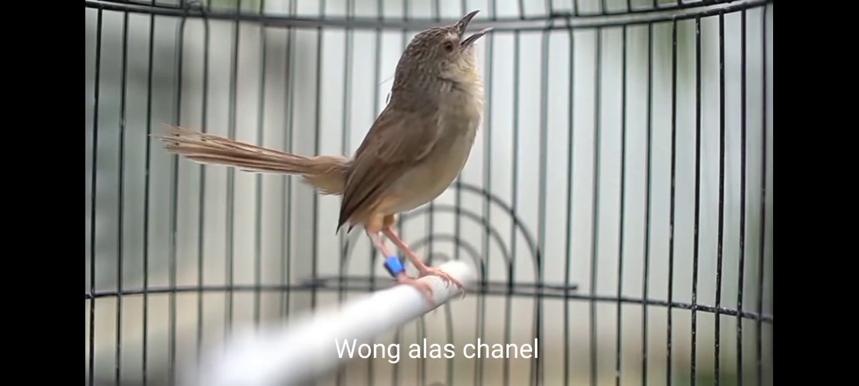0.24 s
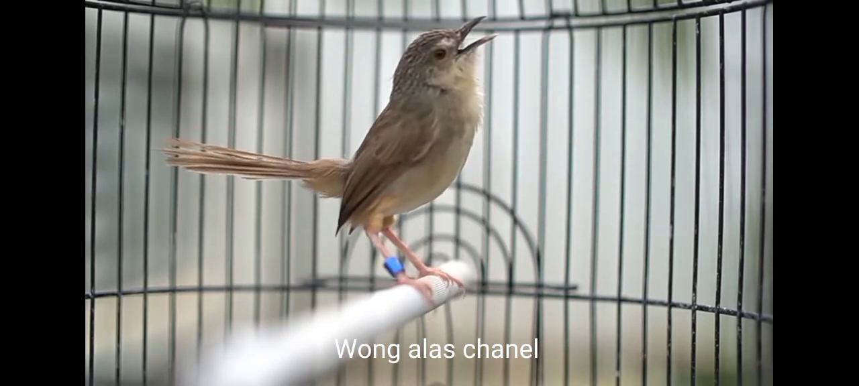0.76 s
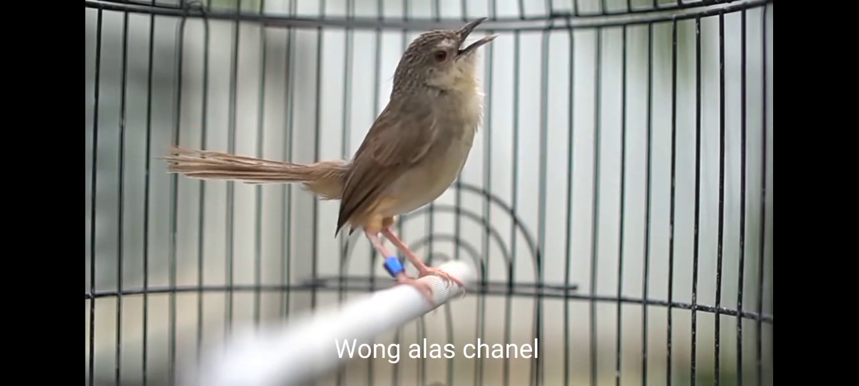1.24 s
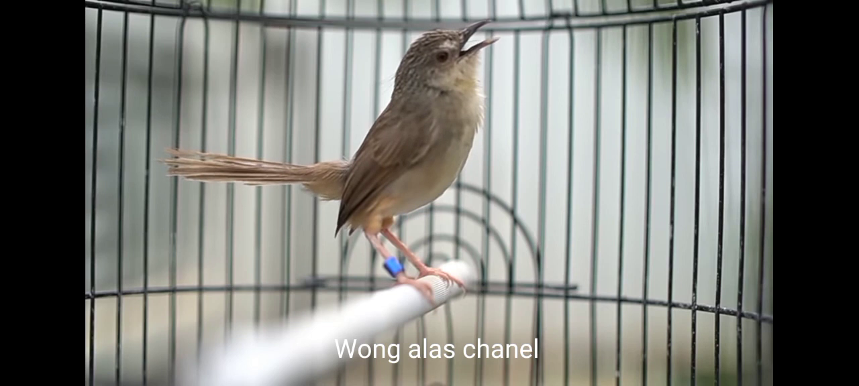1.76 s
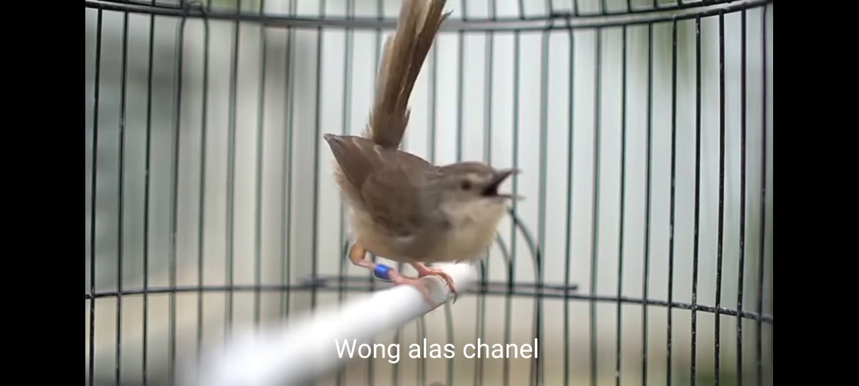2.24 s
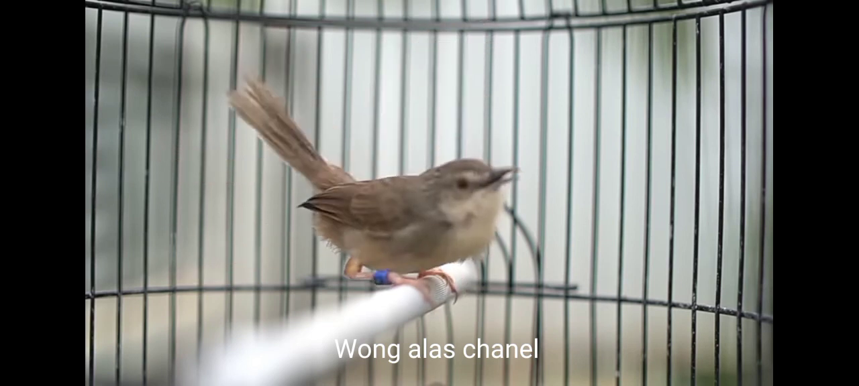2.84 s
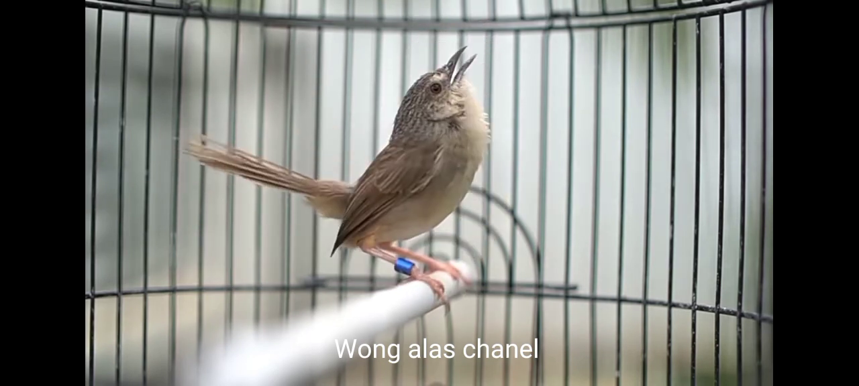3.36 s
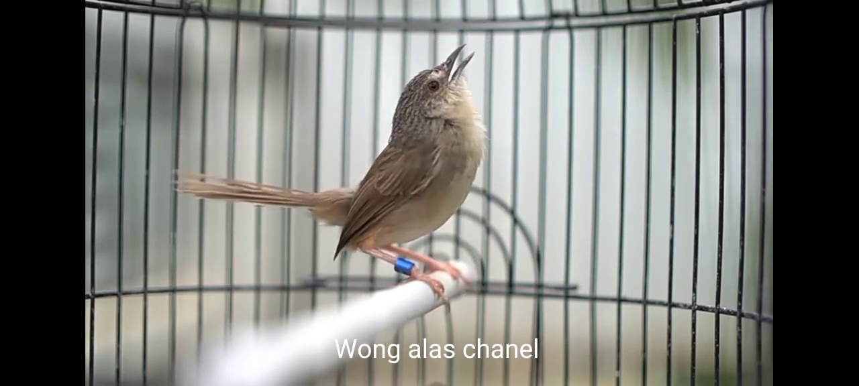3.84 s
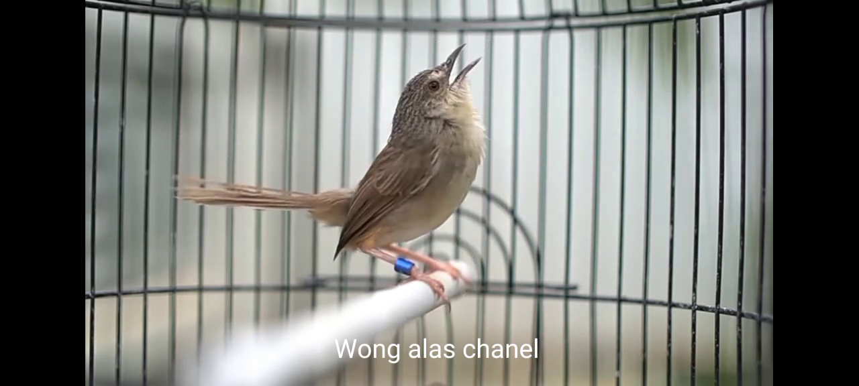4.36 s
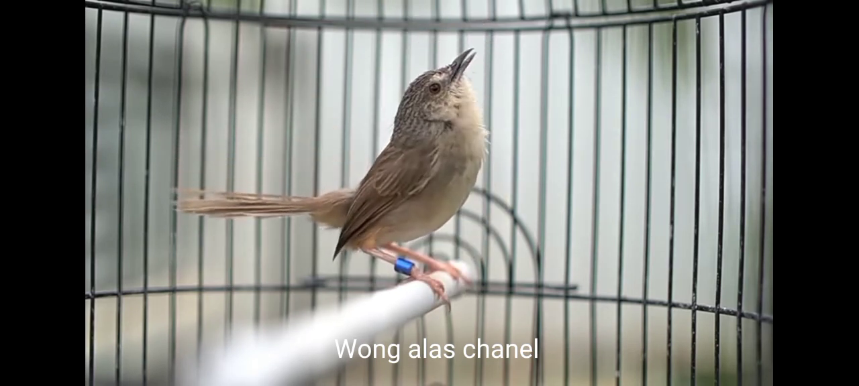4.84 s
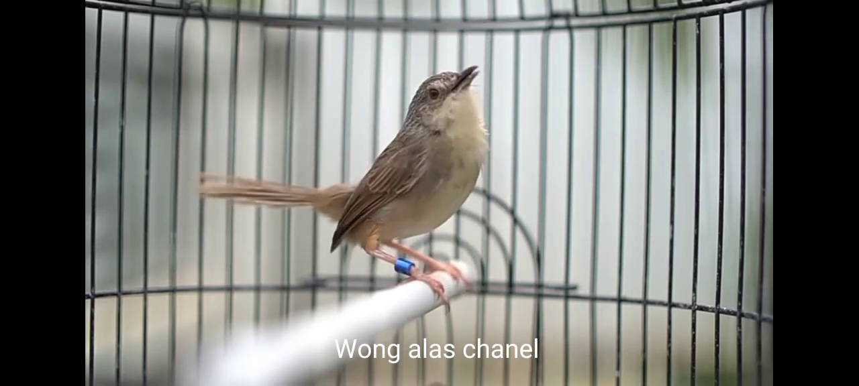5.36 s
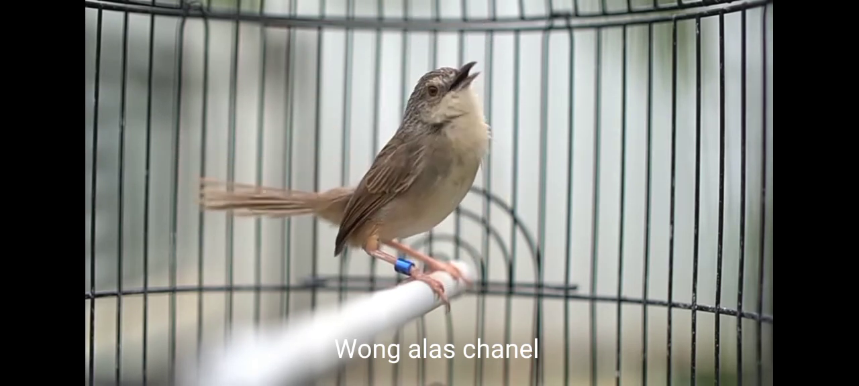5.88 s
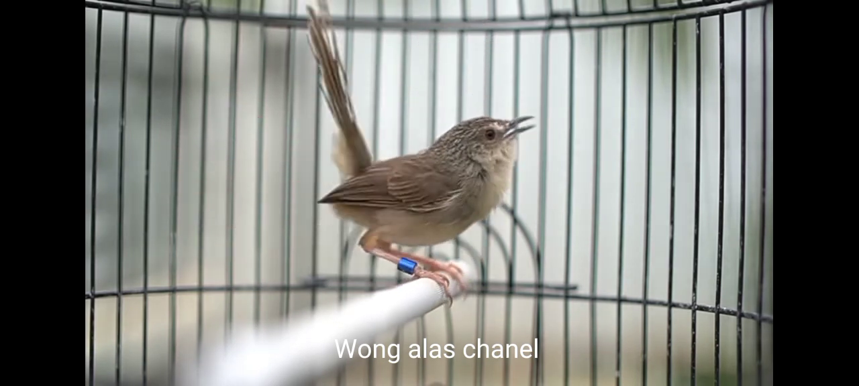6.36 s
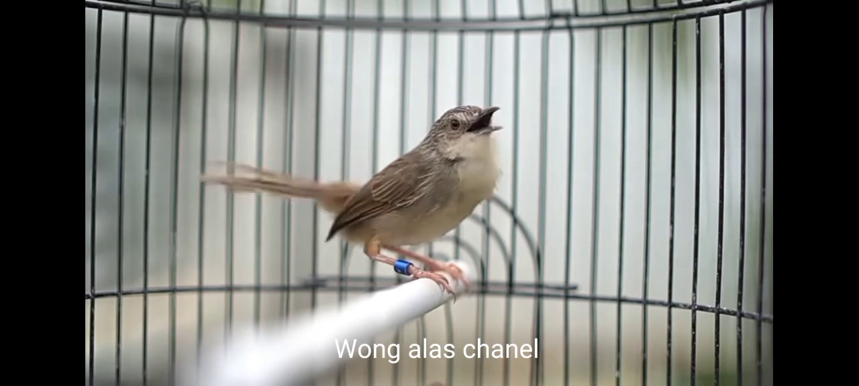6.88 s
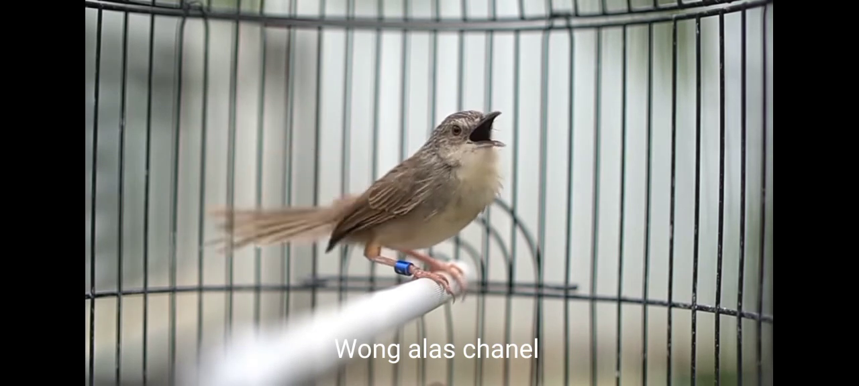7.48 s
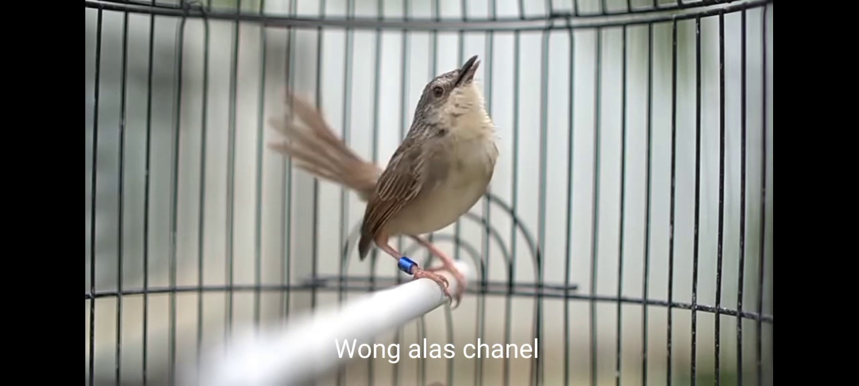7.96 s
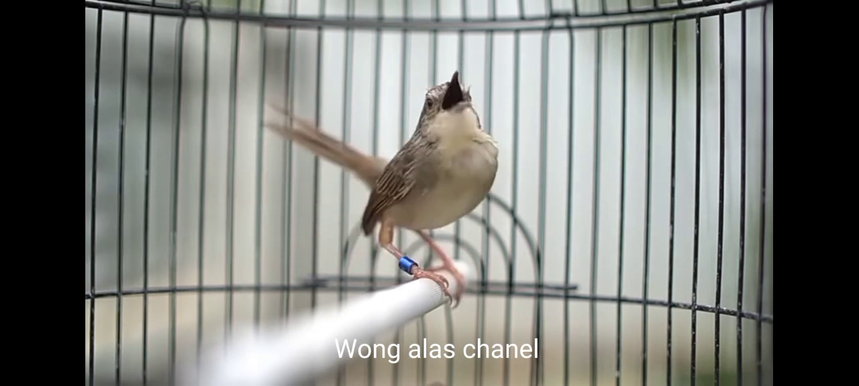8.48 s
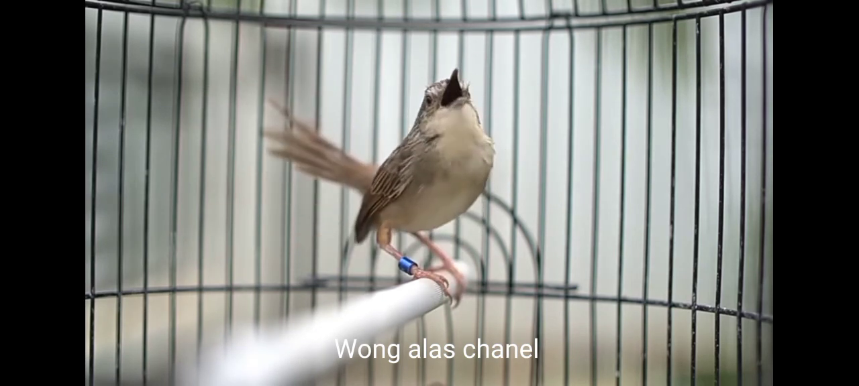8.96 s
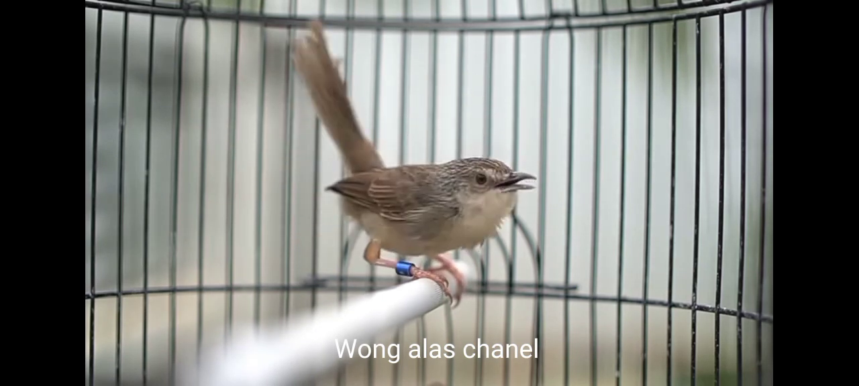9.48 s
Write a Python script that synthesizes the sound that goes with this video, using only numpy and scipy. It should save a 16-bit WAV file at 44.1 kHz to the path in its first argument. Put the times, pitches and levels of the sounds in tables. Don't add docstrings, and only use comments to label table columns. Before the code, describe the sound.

A small caged songbird close by sings bright rapid trills of down-swept whistles, with hard beak-like ticks and faint distant birds echoing behind.

```python
import sys
import numpy as np
from scipy import signal
from scipy.fft import rfft, irfft, next_fast_len
from scipy.io import wavfile
from scipy.ndimage import uniform_filter1d, minimum_filter1d

SR = 44100
rng = np.random.default_rng(int(sys.argv[2]) if len(sys.argv) > 2 else 0)


def rack_gain(trim_db):
    fader = np.asarray(trim_db, float)
    return 10 ** (fader / 20)


def put_to_file(sound):
    columns = np.atleast_2d(sound).T
    safe = np.clip(columns, -1, 1)
    whole_steps = np.round(safe * 32767)
    wavfile.write(sys.argv[1], SR, whole_steps.astype(np.int16))


N = 428211

# t/s, peak level/dB, treble/dB
RATTLE = [(0.0, -50, 17), (0.1, -52, 11), (0.2205, -51.5, 19), (0.353, -51, 18), (0.4883, -48.5, 24),
          (0.5993, -50, 33), (0.7348, -50.5, 27), (0.8507, -50, 28), (0.971, -48.5, 25), (1.098, -49.5, 25),
          (1.2214, -47.5, 23), (1.352, -51.5, 29), (1.4736, -49, 25), (1.597, -47.5, 23), (1.724, -49, 30),
          (1.852, -50, 26), (4.8101, -58, 32), (5.0388, -63, 41), (5.2893, -54, 20), (5.53, -53.5, 13),
          (5.77, -54, 5), (5.998, -59, 39), (6.242, -50, 22), (6.48, -50, 26), (6.7, -50, 24)]


def bird():
    fall_shares = (0, .2, .45, .7, .88, 1)
    # f/Hz, peak level/dB
    throat = [(1800, -74.5), (2300, -52), (2900, -42), (3600, -30), (4050, -29.5), (4600, -25.5),
              (5050, -26), (5600, -25.5), (6200, -21), (6600, -23.5), (7200, -19.5), (7500, -26),
              (7800, -25), (8200, -35)]
    # f/Hz, level/dB
    leak = [(1400, -39), (2100, -6), (2800, -6.5), (3900, 3.5), (7000, -0.5), (8800, -16.5), (10200, -24.5),
            (10900, -12.5), (11800, -8), (14000, -9), (16000, -7.5)]
    multiples = (.5, 1.5, 2, 2.5, 3, 4, 5)
    partial_db = (-39, -41.5, -23, -38.5, -22, -55, -54.5)
    partial_slopes = (2.5, 5, 2.5, 1.5, 1.5, .6, .6)
    # t/s, level/dB
    facing_phone = [(2.0, 0), (2.6, 4.5), (3.1, 0), (3.6, -0.5), (4.7, 2.5), (5.3, 1), (6.2, -0.5),
                    (6.6, 1), (6.9, 3.5), (9.0, 0), (9.7, 3)]
    # t/s, turn, tip
    head = [(2.0, -0.7, 0.32), (2.5, 0.16, -0.15), (2.9, -0.18, 0), (3.4, -0.97, -0.73),
            (3.55, -0.88, -0.61), (4.7, -1.2, 0.35), (5.3, -0.17, 0.31), (5.6, -0.000098, 0.3),
            (5.9, -.3, 1.3), (6.45, 0.43, 0.66), (6.65, 0.089, 0.36), (6.8, 0.76, 0.058), (7.4, 1, -0.13),
            (7.75, 0.23, -0.081), (8.5, 0.31, 0.19), (9.06, .8, 0.0088), (9.3, 1.1, 0.24),
            (9.6, 0.91, -0.41)]
    # f/Hz, level/dB per turn
    turn_colour = [(3300, 0.2), (4000, 0.6), (4700, 3), (5500, -0.5), (6300, -2.5), (7000, -1), (7500, 1)]
    # f/Hz, level/dB per tip
    tip_colour = [(3300, -0.5), (4000, -1.5), (4700, -1.1), (5500, 3), (6300, 1.2), (7000, -2.2),
                  (7400, -2)]
    # t/s, strength/dB, lift low in the sweep/dB
    half_pitch = [(2.0, 2, 3), (2.8, 1, 8), (3.6, -6, 5.5), (4.7, -4, 7), (5.6, 5, -4), (6.6, 2, 3),
                  (6.9, 0, 3), (7.4, -3, 6), (7.6, -5.5, -4), (9.0, -3.2, -3), (9.2, -6.5, 1),
                  (9.7, -4.5, 2)]
    # t/s, level/dB
    gape = [(2.2, 2.5), (2.4, 0.5), (3.3, -0.5), (3.5, 1), (4.7, 0.5), (6.6, 0.5), (6.78, 2.5), (6.95, 0),
            (7.35, 1.5), (7.55, -4.5), (7.76, -2.5), (7.97, 0.7), (8.2, 2), (8.4, 0), (8.62, -2.5),
            (8.85, -2.5), (9.06, -1.5), (9.28, 2.5), (9.7, 1.5)]

    times, pitch, rise_db, high_db, low_db = [], [], [], [], []
    for top, rise, fall, start_hz, bend, up_db, note_high_db, note_low_db in song():
        dive = (bend[-1] - 1850) / (bend[-2] - bend[-1]) * .12 * fall * .7
        times += [top - 1.5 * rise, top - 1.22 * rise, top - rise, top - 0.25 * rise]
        times += [top + share * fall for share in (0, .07) + fall_shares[1:]]
        times += [top + fall + dive, top + fall + dive + 0.005]
        pitch += [start_hz - 600, start_hz - 450, start_hz, start_hz + .8 * (bend[0] - start_hz)]
        pitch += [*bend, 1900, 1820]
        rise_db += [-70, up_db - 30.0, 1.5 * min(up_db, 0) - 13.0, up_db]
        rise_db += [0.41 * up_db - 2.5, 0.089 * up_db - .8, 0, 0, 0, 0, 0]
        rise_db += [-.25 * max(80 - 1000 * fall, 0), -70]
        high_db += [note_high_db] * 13
        low_db += [note_low_db] * 13

    t = np.arange(N) / SR
    effort, high, low = (np.interp(t, times, v) for v in (rise_db, high_db, low_db))
    hz = uniform_filter1d(bent(t, times, pitch), int(.002 * SR)) * (1 + .003 * walk(150))
    effort += low + (high - low) * np.clip((hz - 3600) / 1500, 0, 1)
    effort += .5 * walk(250)
    phase = 2 * np.pi * np.cumsum(hz) / SR

    turn, tip = curve(head), curve(np.array(head)[:, ::2])
    main = at_hz(hz, throat) + effort + turn * at_hz(hz, turn_colour) + tip * at_hz(hz, tip_colour)
    main += curve(gape) * np.clip((hz - 7150) / 250, 0, 1)
    voice = rack_gain(main) * np.sin(phase)

    shadow = curve(half_pitch)
    shadow += curve(np.array(half_pitch)[:, ::2]) * np.clip((6000 - hz) / 1500, 0, 1)
    facing = curve(facing_phone)
    flung = np.clip(np.gradient(hz) / 6, 0, 1)
    shimmer = .22 * walk(500)
    for k, db, slope in zip(multiples, partial_db, partial_slopes):
        heard = k * hz < .4 * SR
        level = db + slope * (hz - 6500) / 1000 + main + at_hz(k * hz, leak)
        level += 6.9 * flung + facing if k > 1 else shadow
        level += 2.75 * min(k, 1.5) * walk(83)
        voice += heard * rack_gain(level) * np.sin(k * phase + shimmer * k)

    flick_air = noise([(1800, -61.5), (2800, -16), (5000, -1), (14000, -4), (16000, -9)])
    steady_air = noise([(8000, -44.0), (10500, -5.0), (14000, -1), (16000, -9.0)])
    rush = flung * rack_gain(main + facing - 28) * flick_air + rack_gain(main + facing - 47) * steady_air
    return (voice + rush) * (effort > -66)


def song():
    # t/s at the top, fall/ms, f/Hz at 45 % of the fall, flick effort/dB, strength/dB
    drops = [
        (2.016, 109, 4079, -18.5, -1.9),
        (4.6763, 114, 4048, -18, -4.5),
        (4.9193, 119.0, 3962, -11.5, -3),
        (5.1618, 120, 3970, -5, -0.5),
    ]
    arches = [
        (2.2094, 54.03, 6870, -0.2, 0.19),
        (5.389, 48.9, 6770, 0.72, 0.36),
    ]
    trill_a = [(2.3065, 31.4, 5740, -8.5, -0.3), (2.3861, 35.7, 5310, -7, -0.6),
               (2.4682, 36.6, 5180, -10.5, -0.1), (2.5494, 36.3, 5170, -15.5, -0.4),
               (2.6325, 36, 5110, -11.5, -0.6), (2.7174, 37.7, 5160, -10, -0.2),
               (2.8023, 39.1, 5200, -10.5, 0.3), (2.8918, 38.3, 5210, 1.5, 0.1),
               (2.9841, 38.9, 5130, 4.5, -0.1), (3.0757, 42, 5300, 7, -0.5), (3.1693, 41.6, 5190, 1, -0.4),
               (3.2636, 52, 4930, 4, -0.46), (3.3657, 68.4, 4490, 5.5, -0.4)]
    trill_b = [(5.4792, 33.11, 5750, -28, 0.68), (5.559, 37.2, 5160, -12, 0.045),
               (5.641, 37.7, 5150, -10.5, -0.75), (5.7222, 37.5, 5120, -21, 0),
               (5.806, 39.12, 5120, -23, -0.67), (5.8919, 37.8, 5140, -25.5, 0.41),
               (5.9788, 36.1, 5220, -18, 0.07), (6.0644, 39.3, 5140, -6, -0.17),
               (6.153, 38.76, 5300, -12.5, 0.75), (6.2432, 40.8, 5210, -7, 0.2),
               (6.3353, 42.8, 5290, -5.5, -0.65), (6.43, 46.9, 5120, -1, -0.43),
               (6.5277, 50.9, 4910, -2, 0), (6.6283, 70.9, 4650, -1.5, 0.082)]
    glide_notes = [(3.5032, 101.2, 5473, 0.5, -1.05), (6.7762, 98.1, 5415, 1, 0.13),
                   (6.951, 108.6, 5840, -1, 0.81), (7.1471, 110.2, 5855, 1, 1),
                   (7.3493, 113.1, 5930, 2, -0.29), (7.5489, 113.6, 5956, 4.5, 0.72),
                   (7.7502, 116.7, 6097, 3, -0.35), (7.9656, 124.1, 5990, 0, -0.68),
                   (8.1864, 112, 6185, 2, -1.5), (8.3909, 124.4, 6020, 0, -0.49),
                   (8.6061, 122.9, 6115, 0, 0.31), (8.8372, 124.4, 6170, -0.5, 0.056),
                   (9.0583, 124.1, 6210, 2.5, -1.2), (9.2704, 121.1, 6074, 0.5, -0.34),
                   (9.4814, 125.8, 6135, -1, -0.22), (9.7034, 129, 6400, -1.5, 0.9)]
    # f/Hz at the top, then at 20, 45, 70, 88 and 100 % of the fall
    drop_hz = (7820, 5160, 4270, 3470, 2920, 2124)
    arch_hz = (7690, 7470, 6940, 5650, 4490, 3330)
    trill_hz = (8240, 6560, 5150, 3970, 3313, 2697)
    glide_hz = (7520, 7305, 6016, 4660, 3340, 2400)
    # start f/Hz, rise/ms, early sink as share of the step to 20 % (below 0: a slight
    # swell up), effort while high/dB, while low/dB
    drop_push = (6000, 4.5, 0.38, 0.32, 8.3)
    arch_push = (4200, 15, 0, -1.1, -9.5)
    trill_push = (4200, 8.5, 0.58, 0.4, -1)
    glide_push = (4200, 11, -.2, .8, 2.5)
    bow = (0.036, 0.18, 1, 0.9, 0.75, 0.49)
    overshoot_hz_per_db = 10
    sag_high_db_per_khz, sag_low_db_per_khz = -1.9, 5

    kinds = ((drops, drop_hz, drop_push), (arches, arch_hz, arch_push),
             (trill_a + trill_b, trill_hz, trill_push), (glide_notes, glide_hz, glide_push))
    sung = []
    for rows, usual, (start_hz, rise, sink, high_db, low_db) in kinds:
        for top, fall, middle_hz, up_db, db in rows:
            sag = usual[2] - middle_hz
            bend = list(usual - sag * np.array(bow))
            bend[0] += overshoot_hz_per_db * min(up_db, 0)
            bend.insert(1, bend[0] + sink * (bend[1] - bend[0]))
            note_high_db = db + high_db + sag_high_db_per_khz * sag / 1000
            note_low_db = db + low_db + sag_low_db_per_khz * sag / 1000
            sung.append((top, rise / 1000, fall / 1000, start_hz, bend, up_db, note_high_db, note_low_db))
    return sorted(sung)


def ticks():
    # t/s, peak level/dB, crack/dB, upper
    # rings/dB, ring f/Hz
    snaps = [(0.548, -26.5, -13, 11, 2260), (1.3863, -25.5, -7.5, 15.5, 2410),
             (1.7776, -26, -23, 15.5, 2340), (1.8063, -45.5, -23, -1, 2360), (2.2518, -33, -2, 0, 2400),
             (2.2815, -54, -25, -10, 2380), (2.8427, -33, -10, -2, 2350), (2.872, -54, -22.5, -12, 2350),
             (3.846, -34, -0.5, 7, 2440), (4.3669, -28, -6, 12.5, 2420), (4.3955, -50, -22, -13, 2400),
             (4.9838, -30, 1, 5, 2450), (5.4662, -26.5, -9.5, -18, 2395), (6.3014, -40.5, 1, 0, 2325),
             (6.877, -34, 3, 18, 2502), (7.447, -33.5, 0.5, 18, 2380), (8.103, -33, -2.5, 14.5, 2370),
             (8.6054, -34, -14, 3, 2366)]
    # multiple of the ring pitch, level/dB, time to fall 60 dB/s
    modes = [
        (1.002, -1, .011),
        (1.04, -11, 0.016),
        (1.45, -28, 0.0032),
        (1.85, -31, 0.0067),
        (2.4, -25, 0.0035),
        (2.95, -19.5, .005),
    ]
    knock_db = (-26.5, -34, -27, -50, -30, -60, -38, -50, -60, -28, -62, -33, -32, -47, -38, -37, -36, -41)
    # t/s, peak level/dB
    thuds = [
        (0.549, -88),
        (2.255, -82),
        (2.845, -70),
        (3.85, -83),
        (4.95, -76),
    ]

    t = np.arange(int(0.037 * SR)) / SR
    late = np.maximum(t - .0022, 0)
    cracks = rng.standard_normal((len(snaps), len(t))) * np.exp(-.5 * ((t - .0023) / .0003) ** 2)
    snap = np.zeros(N)
    for (start, peak_db, crack_db, upper_db, ring_hz), crack in zip(snaps, cracks):
        rings = [rack_gain(db - 60 * late / t60) * np.sin(2 * np.pi * k * ring_hz * late) for k, db, t60 in modes]
        hit = sum(rings[:2]) + rack_gain(upper_db) * sum(rings[2:]) + rack_gain(crack_db - 0.5) * crack
        i = int(start * SR)
        snap[i:i + len(t)] += rack_gain(peak_db) * hit
    snap = signal.sosfilt(signal.butter(4, (1900, 13500), "band", fs=SR, output="sos"), snap)

    shudder = through(strikes(thuds, np.transpose(thuds)[1]), np.exp(-np.arange(SR // 2) / SR / 0.076))
    knock = np.diff(np.exp(-.5 * ((t - .0025) / .00018) ** 2), prepend=0)
    body = through(strikes(snaps, knock_db), knock)
    shudder *= noise([(60, -25.5), (200, 5.0), (450, -4.0), (800, -5), (2000, -59)])
    return snap + body + shudder


def rattle():
    # f/Hz, level/dB per Hz
    breath_colour = [(880, -52), (1500, -4), (1720, -31), (2300, -10.5), (3220, 11), (3940, -1), (4560, 4),
                     (4930, 6), (8020, -1), (9500, -57), (12400, -31), (20900, -120)]
    # f/Hz, level/dB per Hz
    treble_colour = [(8000, -52), (9700, -37), (10400, 1), (11400, -10), (12300, 1), (13300, -18),
                     (15000, -21), (16000, -26)]

    peak_db, treble_db = np.transpose(RATTLE)[1:]
    t = np.arange(int(.4 * SR)) / SR
    body = (1 - np.exp(-t / 0.0039)) * np.exp(-t / 0.096)
    breath = through(strikes(RATTLE, peak_db - 8.5), body) * noise(breath_colour, lumpy_db=7.0)
    breath *= rack_gain(0.58 * walk(49))

    hz = 2900 + 1500 * np.exp(-t / 0.045)
    phase = 2 * np.pi * np.cumsum(hz) / SR
    tone = np.sin(phase) + rack_gain(-4.0) * np.sin(2 * phase) + rack_gain(-14.5) * np.sin(3 * phase)
    call = np.exp(-(t / 0.049) ** 4) * tone
    core = through(strikes(RATTLE, peak_db - 9.5), call) * (0.62 + 0.92 * walk(450))
    core = rack_gain(-9) * core + through(core, tail(0.2, 0.00035))

    puff = (1 - np.exp(-t / 0.0079)) * np.exp(-(t / 0.05) ** 2)
    sheen = through(strikes(RATTLE, peak_db + treble_db - 44.5), puff) * noise(treble_colour, lumpy_db=3.0)
    return breath + core + chatter() + sheen


def chatter():
    chirps_per_call = 6
    when, high, size = rng.random((len(RATTLE), chirps_per_call, 3)).reshape(-1, 3).T
    start, peak_db = np.repeat(np.array(RATTLE)[:, :2], chirps_per_call, axis=0).T
    start = start + 0.056 * when ** 1.4
    length = np.full(len(start), 0.041)
    top_hz = 4600 + 4300 * high ** 1.5
    rows = zip(start, length, top_hz, top_hz - 1300, peak_db - 13.0 - 6 * size)
    chirps = glides(rows, 1 + 0.012 * walk(500), round_off=0.86)
    return through(chirps, tail(0.33, 0.0014, patchy_db=-1.0))


def scolds():
    # t/s, peak level/dB
    bursts = [
        (0.569, -53.5),
        (4.81, -54),
        (5.038, -52),
        (5.289, -57.5),
    ]
    t = np.arange(int(.4 * SR)) / SR
    burst = (1 - np.exp(-t / 0.0047)) * np.exp(-t / 0.11)
    colour = [(2000, -37), (3300, -2), (4300, -35), (5500, -2.0), (6200, -4.5), (7000, -21), (8100, -7),
              (9200, -27)]
    return through(strikes(bursts, np.transpose(bursts)[1]), burst) * noise(colour, 3.1)


def whistles():
    # t/s, length/s, from f/Hz, to f/Hz, level/dB
    calls = [(.23, 0.12, 1424, 1460, -75.5), (.48, 0.16, 1470, 1474, -76), (.7, 0.14, 1514, 1736, -71),
             (.82, 0.24, 1733, 1680, -65.5), (.73, 0.24, 2226, 2470, -71), (.56, 0.1, 2400, 2620, -60),
             (.35, .1, 2550, 2500, -74), (4.45, 0.22, 1073, 970, -83), (.93, 0.076, 2760, 2750, -65),
             (1.24, 0.19, 1722, 1847, -62), (1.252, 0.31, 1430, 1710, -70.5), (1.58, 0.14, 952, 912, -68),
             (1.85, 0.11, 1394, 1376, -68), (2.28, 0.14, 3330, 3330, -62), (2.4, 0.045, 1115, 1150, -80),
             (2.58, 0.09, 2430, 2450, -64), (2.76, 0.054, 2850, 2925, -62), (3.72, 0.13, 2220, 2330, -75),
             (3.87, 0.24, 2380, 2460, -73.5), (4.2, 0.12, 1800, 1970, -73), (4.11, 0.25, 1674, 1818, -66),
             (5.88, 0.089, 1097, 1108, -77), (6.9, 0.55, 2213, 2370, -67), (7.35, 0.2, 1955, 1790, -70),
             (7.66, 0.13, 1430, 1380, -81), (7.993, 0.07, 3140, 2920, -59.5), (8.38, 0.11, 2496, 2150, -71),
             (9.26, .09, 1294, 1250, -83), (9.2, .47, 1900, 1960, -78), (9.498, 0.079, 1280, 1270, -76),
             (9.62, 0.083, 1370, 1370, -87)]
    # t/s, length/s, from f/Hz, to f/Hz, level/dB
    bumps = [
        (3.17, 0.22, 230, 215, -70.5),
        (8.86, 0.21, 365, 369, -86.5),
        (4.63, 0.091, 300, 300, -81),
    ]
    # t/s, to f/Hz, level/dB
    slow_sweeps = [
        (3.874, 5280, -65),
        (4.086, 2800, -59),
        (4.404, 3530, -58.5),
    ]
    # t/s, f/Hz, level/dB
    high_peeps = [
        (5.955, 10970, -63),
        (6.679, 10700, -61),
        (9.55, 11300, -64),
    ]
    sweep_s, sweep_hz, sweep_hold = .13, 7100, 1.15
    peep_s, peep_sink = .07, .045

    waver = 1 + .012 * walk(30) + .014 * walk(250)
    hoarse = 1 + .03 * walk(600)
    flutter = .8 + .8 * walk(110)
    sweeps = [(s, sweep_s, sweep_hz, hz, db) for s, hz, db in slow_sweeps]
    peeps = [(s, peep_s, hz, hz * (1 - peep_sink), db) for s, hz, db in high_peeps]
    far = rack_gain(-3.5) * glides(calls + peeps, waver, round_off=.3) * flutter
    farthest = glides(sweeps, hoarse, sweep_hold, fade_db=15.0) * (0.66 + walk(900))
    farthest = through(farthest, tail(0.6, 0.003, patchy_db=1.5))
    hums = glides(bumps, hoarse ** 3, round_off=1) * flutter
    return through(far, tail(.32, .004)) + rack_gain(-11) * far + hums + farthest


def insect():
    # t/s, level/dB
    loudness = [
        (0, -73.5),
        (2, -73.5),
        (3.6, -73.5),
        (4.7, -70),
        (6, -82),
        (9.71, -85),
    ]
    line = np.sqrt(2) * np.sin(2 * np.pi * np.cumsum(4850 + 70 * walk(300)) / SR)
    buzz = noise([(4300, -27.5), (4650, -11.0), (4850, -5.5), (5050, -11), (5400, -37.0)])
    return rack_gain(curve(loudness) + 2.0 * walk(40)) * (line + 0.65 * buzz)


def chorus_hiss():
    # t/s, level/dB
    loudness = [(0, -81), (1.9, -77), (3.6, -87.5), (4.05, -91.5), (4.3, -85.5), (4.65, -83.5), (4.9, -72),
                (5.5, -82.5), (6.6, -81.5), (7.0, -84), (7.5, -85), (9.1, -95), (9.3, -83), (9.71, -86)]
    # f/Hz, level/dB per Hz
    colour = [(300, -29), (650, -36.5), (1000, -22.5), (1500, -26), (2500, -13), (5000, -14), (7500, -17),
              (9000, -25.5), (14000, -35.5), (16000, -49)]
    chorus = rack_gain(curve(loudness) + 17.5) * noise(colour, lumpy_db=1.5)
    edges_hz = (250, 800, 1300, 2000, 3200, 4600, 7000, 17000)
    hiss = np.zeros(N)
    for pair in zip(edges_hz, edges_hz[1:]):
        band = signal.sosfilt(signal.butter(2, pair, "band", fs=SR, output="sos"), chorus)
        hiss += band * rack_gain(2.0 * walk(12))
    return hiss


def low_rumble():
    # t/s, level/dB
    loudness = [(0.0, -83.5), (2.19, -73.5), (2.4, -85), (3.3, -81), (3.43, -85), (5.38, -76.5),
                (5.65, -86.5), (7.17, -86), (7.73, -93.5), (9.66, -86.5), (9.71, -92)]
    # f/Hz, level/dB per Hz
    colour = [(18, -30), (36, 5), (54, 4.5), (124, 4), (167, -3.5), (192, -2.5), (228, -8), (492, -21),
              (600, -19), (780, -52.5), (1320, -120)]
    gusts_db = 2.2 * walk(12)
    return rack_gain(curve(loudness) + gusts_db) * noise(colour)


def glides(rows, waver, hold=1, fade_db=0, round_off=0.056):
    out = np.zeros(N)
    for start, length, from_hz, to_hz, db in rows:
        share = np.arange(int(length * SR)) / (length * SR)
        span = slice(int(start * SR), int(start * SR) + len(share))
        hz = (from_hz + (to_hz - from_hz) * share ** hold) * waver[span]
        swell = rack_gain(db - fade_db * share) * np.sin(np.pi * share) ** round_off
        out[span] += swell * np.sin(2 * np.pi * np.cumsum(hz) / SR)
    return out


def bent(t, times, values):
    times, values = np.array(times), np.array(values)
    step = np.diff(values) / np.diff(times)
    same = step[:-1] * step[1:]
    slope = np.where(same > 0, 2 * same / (step[:-1] + step[1:] + (same <= 0)), 0)
    slope = np.pad(slope, 1)
    i = np.clip(np.searchsorted(times, t) - 1, 0, len(step) - 1)
    width = times[i + 1] - times[i]
    u = np.clip((t - times[i]) / width, 0, 1)
    bow = (1 - u) * (slope[i] - step[i]) - u * (slope[i + 1] - step[i])
    return values[i] + u * width * (step[i] + (1 - u) * bow)


def curve(table):
    return np.interp(np.arange(N) / SR, *np.transpose(table)[:2])


def at_hz(hz, table):
    knots, db = np.transpose(table)
    return np.interp(np.log(np.maximum(hz, 1)), np.log(knots), db)


def noise(table, lumpy_db=0., lump_hz=140):
    size = next_fast_len(N)
    hz = np.arange(size // 2 + 1) * SR / size
    lumps = np.interp(hz / lump_hz, np.arange(400), rng.standard_normal(400))
    colour = rack_gain(at_hz(hz, table) + lumpy_db * lumps)
    x = irfft(rfft(rng.standard_normal(size)) * colour, size)[:N]
    return x / x.std()


def walk(rate_hz):
    k = int(SR / rate_hz)
    x = uniform_filter1d(uniform_filter1d(rng.standard_normal(N), k), k)
    return x / x.std()


def strikes(table, db):
    x = np.zeros(N)
    x[(np.array(table)[:, 0] * SR).astype(int).clip(0, N - 1)] = rack_gain(db)
    return x


def tail(t60, onset_s, patchy_db=5):
    t = np.arange(int(.9 * SR)) / SR
    patches = np.interp(t / .004, np.arange(230), rng.standard_normal(230).clip(-3, 1.5))
    fade = (1 - np.exp(-t / onset_s)) * rack_gain(-60 * t / t60 + patchy_db * patches)
    x = rng.standard_normal(len(t)) * fade
    return x / np.sqrt(np.sum(x ** 2))


def through(x, response):
    return signal.oaconvolve(x, response)[:N]


def scene():
    # delay/s, level/dB
    bounces = [
        (.0011, -31),
        (.0047, -20),
        (0.013, -34.5),
        (0.024, -36.5),
        (0.034, -31.5),
        (0.054, -45.5),
        (0.071, -41),
    ]
    near = bird() + ticks()
    echoes = sum(rack_gain(db) * np.pad(near, (int(s * SR), 0))[:N] for s, db in bounces)
    dull = signal.sosfilt(signal.butter(1, 7000, fs=SR, output="sos"), near)
    room = rack_gain(-17.5) * through(dull, tail(0.13, 0.0082))
    room += rack_gain(-28.5) * through(dull, tail(0.31, 0.25, patchy_db=0.0))
    far = rattle() + scolds() + whistles()
    background = insect() + chorus_hiss() + low_rumble()
    return (near + echoes + room + far + background)[None]


def top_cut(x):
    return signal.sosfilt(signal.butter(12, 16390, fs=SR, output="sos"), x)


def record(dry):
    limit_db, hold = -20.5, int(.002 * SR)
    room_left = np.minimum(1, rack_gain(limit_db) / (np.abs(dry) + 1e-9))
    held = dry * uniform_filter1d(minimum_filter1d(room_left, hold), hold)
    cut = signal.sosfilt(signal.ellip(8, .3, 40, 15600, fs=SR, output="sos"), held)
    return top_cut(cut)


dry = scene()
out = record(dry)
put_to_file(out)
```